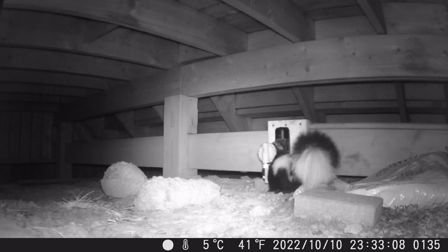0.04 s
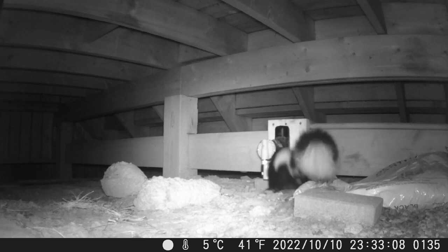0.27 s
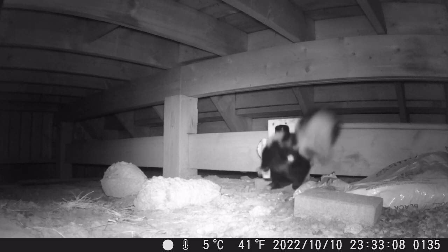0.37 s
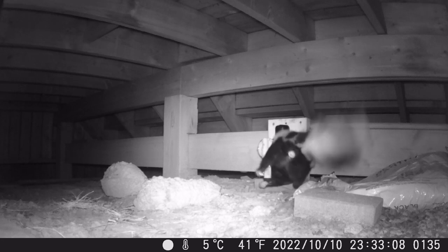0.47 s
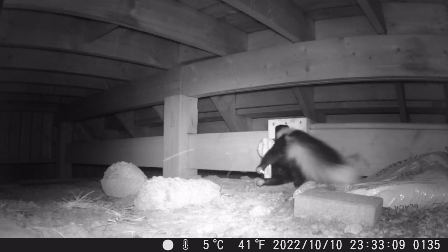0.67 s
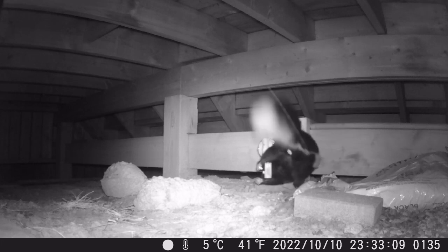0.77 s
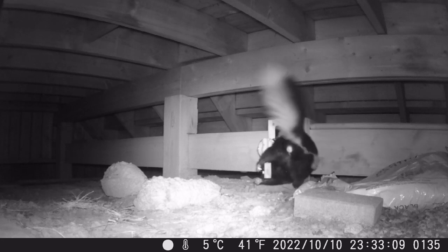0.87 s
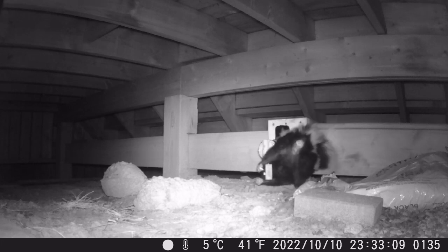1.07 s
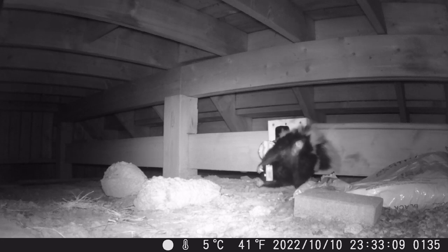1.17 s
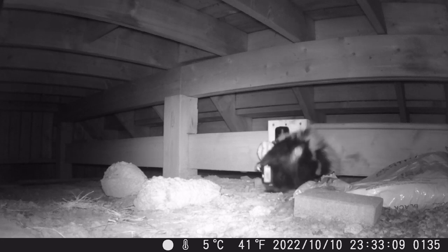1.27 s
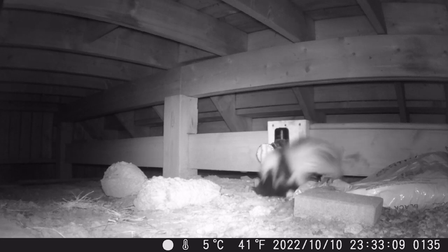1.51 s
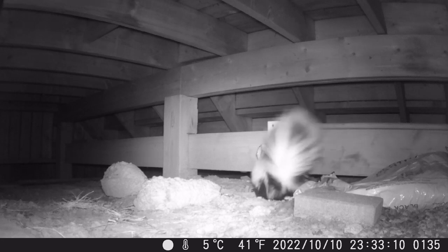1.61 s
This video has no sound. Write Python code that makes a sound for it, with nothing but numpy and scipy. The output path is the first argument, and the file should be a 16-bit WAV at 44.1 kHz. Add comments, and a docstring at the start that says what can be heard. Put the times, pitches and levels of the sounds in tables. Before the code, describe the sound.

In a low, quiet crawl space, one microphone picks up a trap snapping with a loud clack that shakes the timber. Then come two light clicks, faint animal scuffling and a dull thump over a faint rumble.

```python
"""Over a faint rumble, a sharp clack and a boom: a trap mounted on a board fires at a skunk.
The place is a low, quiet crawl space, heard from one microphone. The trigger trips, the striker slams
home and rebounds; the housing clacks, metal parts ring and the timber booms. Two small clicks follow,
the animal scuffs the ground, and its body knocks against the trap with a dull thump."""
import sys
import numpy as np
from scipy import signal
from scipy.fft import rfft, irfft
from scipy.io import wavfile

SR = 44100
rng = np.random.default_rng(int(sys.argv[2]) if len(sys.argv) > 2 else 0)


def pcm_store(signal):
    """Save signal as 16-bit PCM."""
    levels = np.round(np.clip(np.atleast_2d(signal), -1, 1) * 32767)
    wavfile.write(sys.argv[1], SR, levels.astype(np.int16).T)


N = 72765
RING_S = 0.6  # time allowed for each decay


def amp(db):
    """Decibels to gain."""
    return 10 ** (np.asarray(db) / 20)


def add(mix, start_s, sound):
    """Mixes a sound in at its start time."""
    part = mix[max(round(start_s * SR), 0):][:len(sound)]
    part += sound[:len(part)]


def decay(t, t60):
    """A fall of 60 dB every t60 seconds."""
    return np.exp(-np.log(1000) * t / t60)


def noise(spectrum):
    """Noise of unit level with the given colour."""
    hz, db = np.transpose(spectrum)
    log_f = np.log(np.fft.rfftfreq(N, 1 / SR) + 1)
    colour = amp(np.interp(log_f, np.log(hz), db))
    coloured = irfft(rfft(rng.standard_normal(N)) * colour, N)
    return coloured / coloured.std()


def ring(modes, rise_s):
    """Dying sines that swell over a short rise."""
    t = np.arange(0, RING_S, 1 / SR)
    partials = sum(amp(db) * decay(t, t60) * np.sin(2 * np.pi * hz * t) for hz, db, t60 in modes)
    return np.minimum(t / rise_s, 1) * partials


def burst(bands, rise_s):
    """Countless overlapping modes: bands of noise, each dying at its own speed."""
    t = np.arange(0, RING_S, 1 / SR)
    log_f = np.log(np.fft.rfftfreq(len(t), 1 / SR) + 1)
    centres = np.log([hz for hz, _, _ in bands])
    edges = np.r_[2 * centres[0] - centres[1], centres, 2 * centres[-1] - centres[-2]]
    out = np.zeros(len(t))
    for k, (_, db, t60) in enumerate(bands):
        passband = np.sqrt(np.interp(log_f, edges[k:k + 3], [0, 1, 0]))
        band = irfft(rfft(rng.standard_normal(len(t))) * passband, len(t))
        fade = np.minimum(t / rise_s, 1) * decay(t, t60)
        out += amp(db) * band * fade * np.linalg.norm(fade) / (np.linalg.norm(band * fade) + 1e-20)
    return out


def background(hiss_db=-75):
    """Room tone: a low rumble that grows while the animal moves, under faint, steady hiss."""
    # colours of rumble and hiss: (frequency [Hz], relative density [dB])
    rumble_colour = [(10, -14.5), (25, -1.5), (45, 3), (85, -3.5), (125, -11.5), (200, -17.5), (320, -28.5),
                     (600, -46), (3000, -100)]
    hiss_colour = [(20, 0), (200, -1), (400, -1.5), (800, -5.5), (1300, -7), (2000, -12), (3000, -17),
                   (4000, -26.5), (5200, -32), (7000, -24.5), (8400, -30.5), (9500, -43), (15500, -42.5),
                   (17000, -42)]
    # swell of the rumble: (time [s], level [dB])
    swell = [(0, -65.5), (0.191, -66.5), (.45, -56.5), (.59, -64), (.67, -58), (0.849, -65), (1.001, -63),
             (1.12, -63), (1.27, -64), (1.45, -55.5), (1.65, -60)]
    rumble_db = np.interp(np.arange(N) / SR, *np.transpose(swell))
    return amp(rumble_db) * noise(rumble_colour) + amp(hiss_db) * noise(hiss_colour)


def scuffs(grain_db=2.5, skew=0.57):
    """Paws and fur on the ground: short grainy rubs that swell quickly and fade."""
    # scuffs: (time [s], length [s], rub level [dB], grit level [dB])
    strokes = [(0.423, 0.071, -75, -96), (0.551, 0.041, -81, -89), (0.765, 0.016, -73, -79.5),
               (0.845, 0.016, -67, -99), (0.917, 0.02, -70, -94), (1.018, 0.038, -73.5, -82.5),
               (1.195, 0.078, -72.5, -88), (1.298, 0.023, -66.5, -91), (1.348, 0.051, -58, -100),
               (1.544, 0.034, -70, -95)]
    # colours of dull rub and bright grit: (frequency [Hz], relative density [dB])
    rub_colour = [(20, -31), (150, -21), (400, -4.5), (600, 3), (900, -7.5), (1350, -0.5), (1750, -30),
                  (2300, -33.5), (5000, -59), (12000, -81.5)]
    grit_colour = [(20, -36), (800, -27), (2000, 5.5), (3100, 5.5), (3700, -10), (4400, -3.5),
                   (5300, -23.5), (7100, -6), (9000, -21), (10500, -64)]
    out = np.zeros(N)
    for start_s, length_s, rub_db, grit_db in strokes:
        rub = amp(rub_db) * noise(rub_colour) + amp(grit_db) * noise(grit_colour)
        progress = np.arange(0, length_s, 1 / SR) / length_s
        grains = rng.standard_normal(12)
        roughness = amp(grain_db * np.interp(progress, np.linspace(0, 1, len(grains)), grains))
        add(out, start_s, rub[:len(progress)] * roughness * np.sin(np.pi * progress ** skew))
    return out


def clicks():
    """Two small clicks: a bright tick, then a hollow note that takes a few milliseconds to build."""
    # clicks: (time [s], note level [dB], tick level [dB])
    events = [(0.7781, -48, -66.5), (0.9798, -46.5, -74)]
    # modes of the hollow note: (frequency [Hz], level [dB], t60 [s], rise [s])
    note_modes = [(565, 3.5, 0.045, 0.0093), (600, -1, 0.042, 0.0056), (900, -13, 0.035, 0.0038),
                  (1100, -17.5, 0.071, .002), (2153, -13, 0.039, 0.0034), (2710, -14, 0.027, .001),
                  (3370, -13, 0.013, 0.00043), (6950, -26.5, 0.018, 0.00037)]
    # noise bands of the tick: (frequency [Hz], level [dB], t60 [s])
    tick_bands = [(1460, 2.5, 0.031), (2880, -5, 0.015), (3260, -8, 0.011), (4470, -12, 0.01),
                  (7200, -8.5, 0.015), (8300, -9, 0.014), (9400, -24, 0.015)]
    note = sum(ring([(hz, db, t60)], rise_s) for hz, db, t60, rise_s in note_modes)
    out = np.zeros(N)
    for start_s, note_db, tick_db in events:
        add(out, start_s, amp(note_db) * note + amp(tick_db) * burst(tick_bands, rise_s=0.0004))
    return out


def timber():
    """Recoil and the animal's weight shake the board, and the crawl space booms around the microphone."""
    # thumps into the timber: (time [s], flex level [dB], panel level [dB], boom level [dB])
    thumps = [(0.2156, -36.5, -44, -48.5), (0.2267, -53, -41, -63.5), (0.256, -35.5, -47, -66.5),
              (0.2802, -64, -40.5, -57), (0.3620, -47, -66.5, -65.5), (0.388, -47, -73, -68.5),
              (1.0186, -50, -63.5, -69.5), (1.3036, -48.5, -58, -56.5), (1.338, -41, -45.5, -54),
              (1.3615, -41, -49, -53), (1.443, -49.5, -64, -67), (1.4974, -49, -78.5, -69),
              (1.5898, -57.5, -71, -64)]
    # the board's low flexing and higher panel modes: (frequency [Hz], level [dB], t60 [s])
    flex_modes = [(60.5, -15, 0.16), (82.6, 5.5, 0.12), (110, -19.5, .12)]
    panel_modes = [(141.7, -8, 0.81), (179.4, 8, 0.068), (238.8, -6.5, 0.23), (279.2, -9.5, .26),
                   (308.8, -8, 0.29)]
    # dense boom of the space: (frequency [Hz], level [dB], t60 [s])
    boom_bands = [(26.4, 0, 1), (60, -8, 1), (115, 1.5, 0.46), (209, -13, .4), (284, -13, 0.19),
                  (463, -11.5, 0.36), (730, -14, 0.07), (1120, -21.5, 0.13)]
    flex, panel = ring(flex_modes, rise_s=0.004), ring(panel_modes, rise_s=0.004)
    out = np.zeros(N)
    for start_s, flex_db, panel_db, boom_db in thumps:
        boom = burst(boom_bands, rise_s=0.0065)
        add(out, start_s, amp(flex_db) * flex + amp(panel_db) * panel + amp(boom_db) * boom)
    return out


def metal_ring(modes, rise_s, count, spread_hz=71.4):
    """Each metal mode is a cluster of close partials that beat unevenly."""
    t = np.arange(0, RING_S, 1 / SR)
    partials = np.zeros(len(t))
    for offsets_hz in spread_hz * rng.standard_normal((count, len(modes))):
        for offset_hz, (hz, db, t60) in zip(offsets_hz, modes):
            cycles = (hz + offset_hz) * t + rng.random()
            partials += amp(db) * decay(t, t60) * np.sin(2 * np.pi * cycles)
    return np.minimum(t / rise_s, 1) * partials / np.sqrt(count)


def trap():
    """Each blow cracks and rings the metal and the housing, whose pitch depends on where it lands."""
    # blows: (time [s], housing pitch [ratio], housing [dB], rattle [dB], metal [dB], crack [dB])
    blows = [(0.2176, 1.04, -42, -38, -64.5, -75), (0.2299, 1.0, -25.5, -37.5, -60, -45),
             (0.238, 1.095, -37, -43, -66, -51.5), (0.2451, 0.92, -37, -56, -78, -58),
             (0.2597, 1.0, -42.5, -51.5, -71, -64.5), (1.3304, 1.02, -46, -45, -100, -92)]
    # modes of the plastic housing and the metal parts: (base frequency [Hz], level [dB], t60 [s])
    housing_modes = [(521, -21.5, 0.2), (662, -15.5, 0.026), (1010, -17, 0.2), (1062, -6.5, 0.11),
                     (1116, -10.5, .089), (1223.7, 5, 0.051), (1266, -8, 0.047), (1320, -6, 0.077),
                     (1530, -10, 0.034), (1684, -26.5, 0.14)]
    metal_modes = [(2070, 6, .11), (2668, 3, 0.14), (3480, -10, 0.1), (4423, 2, 0.084), (5730, -7.5, 0.062),
                   (6900, 1.5, 0.1), (7200, -7.5, 0.16), (9020, -9.5, 0.11)]
    # dense rattle of the housing, crack of hard contact: (frequency [Hz], level [dB], t60 [s])
    rattle_bands = [(316, -23, 0.25), (595, -11, .19), (830, -19.5, 0.26), (1180, -10, 0.2),
                    (1440, -23, .14), (1770, -28.5, .18)]
    crack_bands = [(1580, -4.5, .07), (2100, -5, .1), (2372, -16.5, 0.067), (2630, -6, 0.072),
                   (3240, -9.5, .07), (3676, -23, 0.081), (5080, -22.5, .055), (5860, -19, 0.029),
                   (7000, -15, 0.04), (8100, -25, 0.034), (9000, -26, .045), (9400, -41.5, .04),
                   (10920, -46, .03)]
    # faint tinks of the metal parts: (time [s], level [dB])
    tinks = [(0.562, -88), (0.7616, -79.5)]
    out = np.zeros(N)
    for start_s, pitch, housing_db, rattle_db, metal_db, crack_db in blows:
        struck_modes = [(hz * pitch, db, t60) for hz, db, t60 in housing_modes]
        housing = amp(housing_db) * ring(struck_modes, rise_s=0.0022)
        rattle = amp(rattle_db) * burst(rattle_bands, rise_s=0.0059)
        metal = amp(metal_db) * metal_ring(metal_modes, rise_s=0.0063, count=12)
        crack = amp(crack_db) * burst(crack_bands, rise_s=0.0015)
        add(out, start_s, housing + rattle + metal + crack)
    tink_modes = [(hz, db, 0.03) for hz, db, _ in metal_modes]  # the same metal, dying in 30 ms
    for start_s, db in tinks:
        add(out, start_s, amp(db) * metal_ring(tink_modes, rise_s=0.0012, count=5))
    return out


def scene():
    """All sources meet at one microphone in the crawl space."""
    return (trap() + timber() + clicks() + scuffs() + background())[None]


def record(dry):
    """The recorder's band limit cuts the treble above 16 kHz."""
    lowpass = signal.firwin(255, 16000, window=("kaiser", 8), fs=SR)
    return signal.oaconvolve(dry, lowpass[None], "same")


dry = scene()
out = record(dry)
pcm_store(out)
```